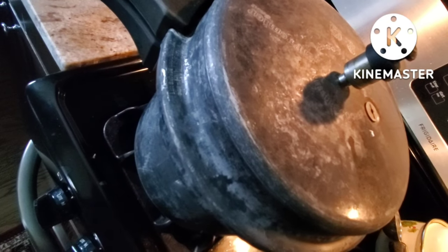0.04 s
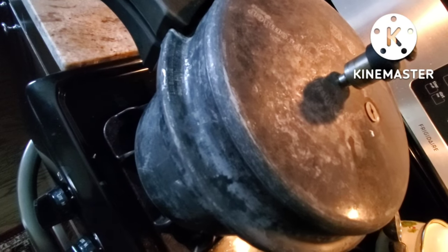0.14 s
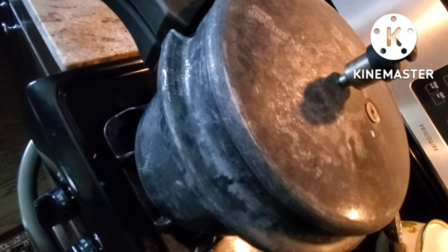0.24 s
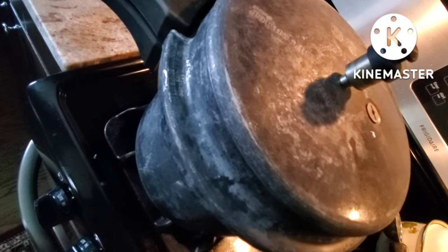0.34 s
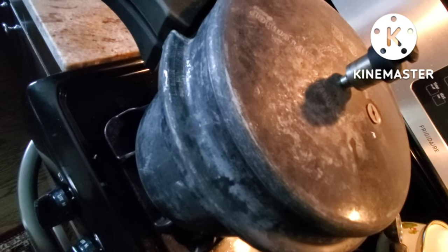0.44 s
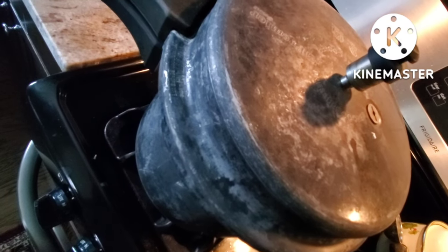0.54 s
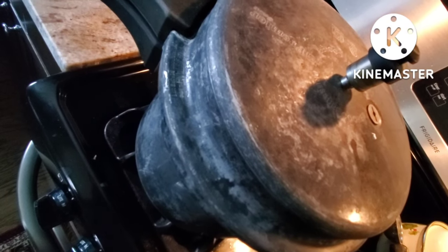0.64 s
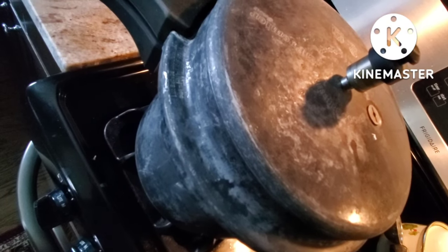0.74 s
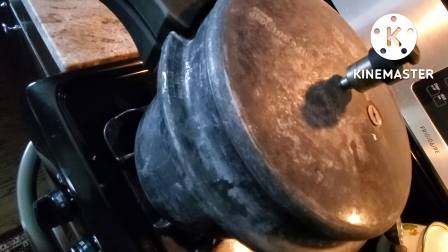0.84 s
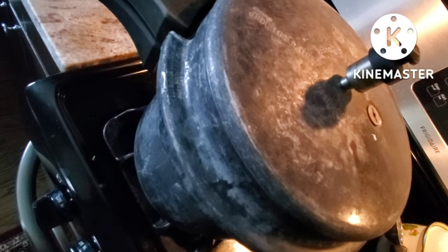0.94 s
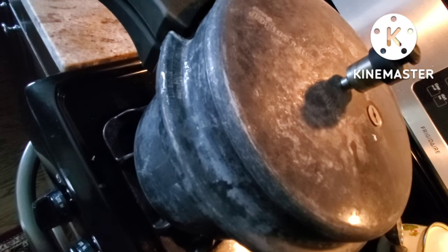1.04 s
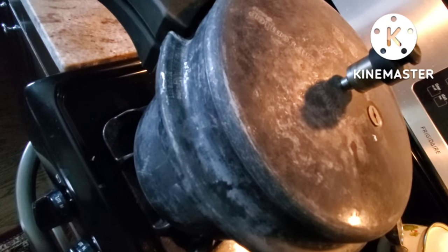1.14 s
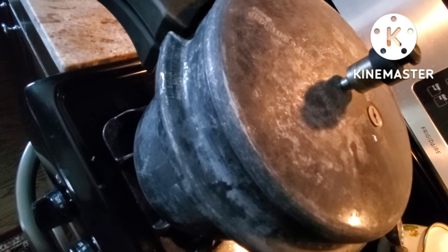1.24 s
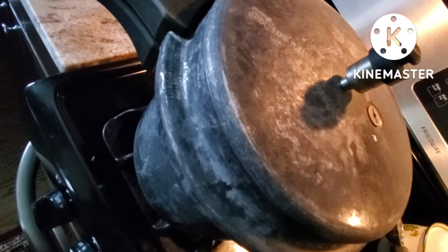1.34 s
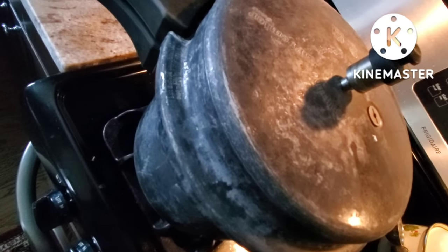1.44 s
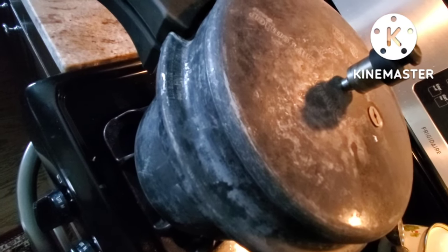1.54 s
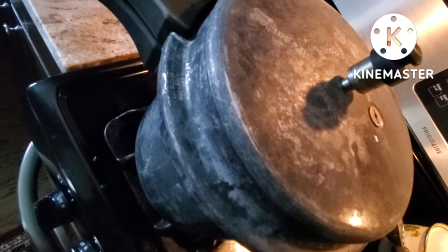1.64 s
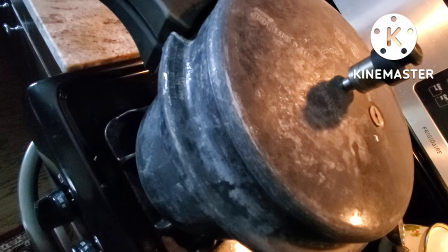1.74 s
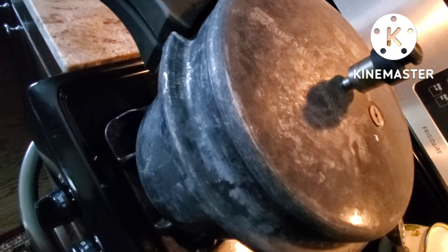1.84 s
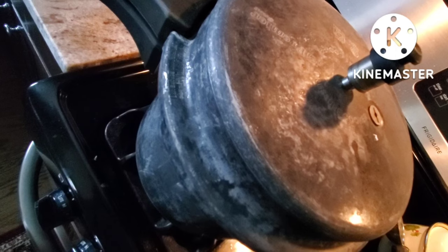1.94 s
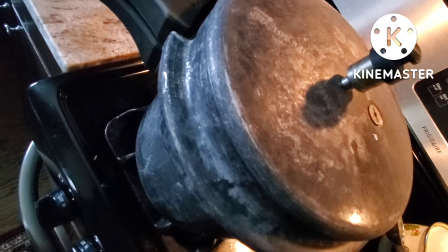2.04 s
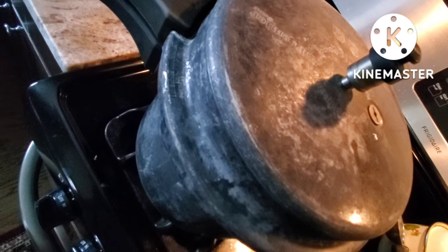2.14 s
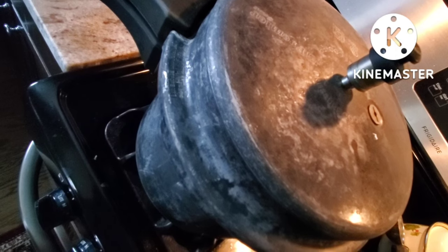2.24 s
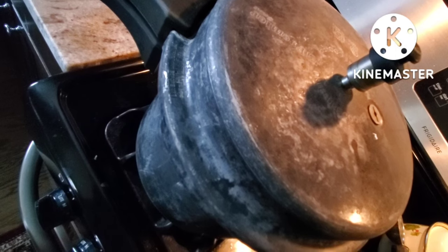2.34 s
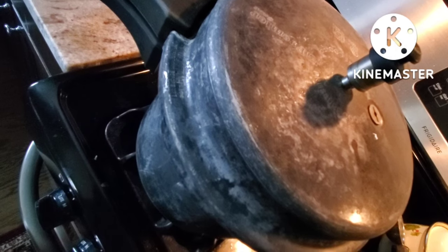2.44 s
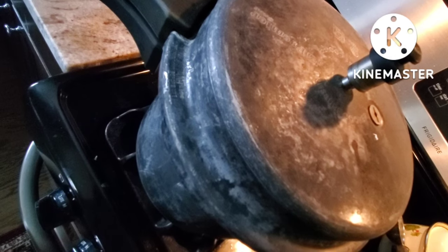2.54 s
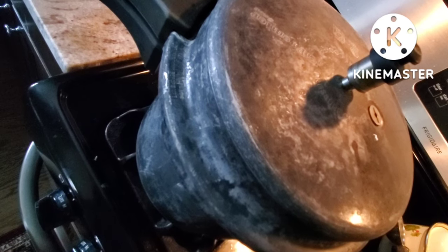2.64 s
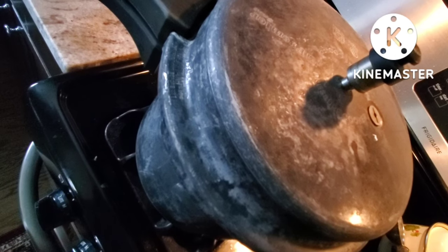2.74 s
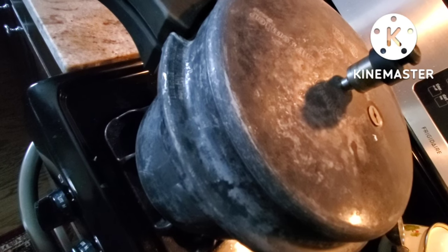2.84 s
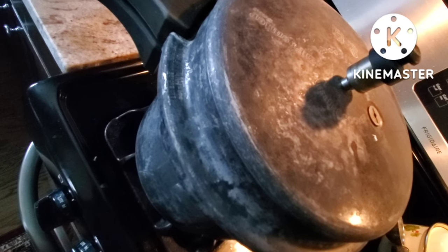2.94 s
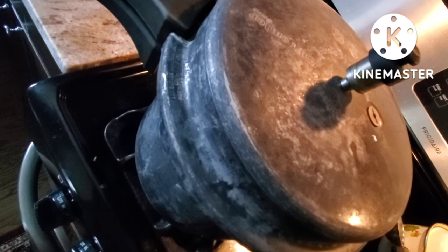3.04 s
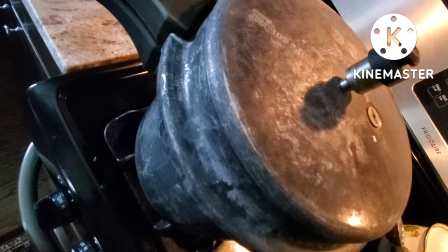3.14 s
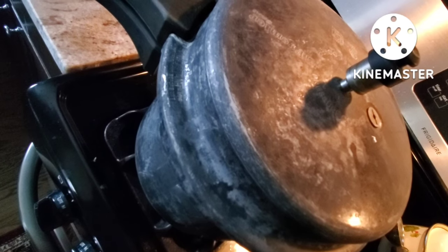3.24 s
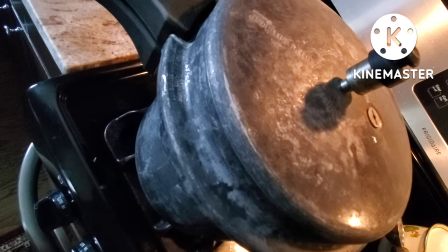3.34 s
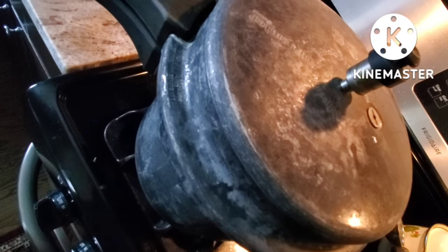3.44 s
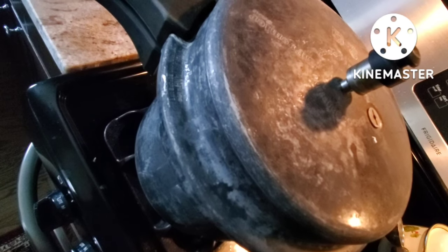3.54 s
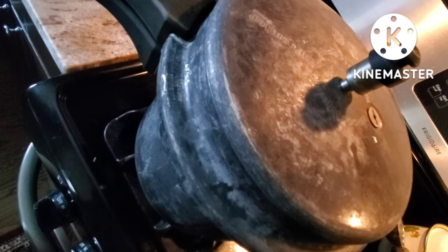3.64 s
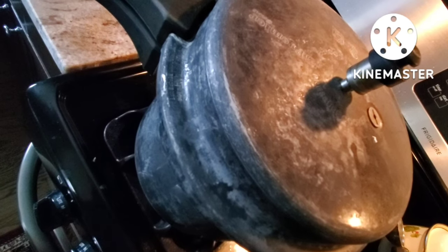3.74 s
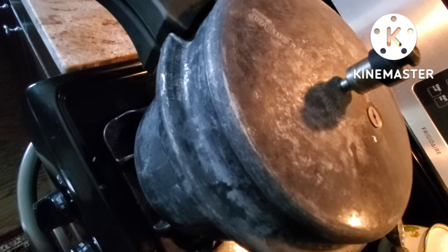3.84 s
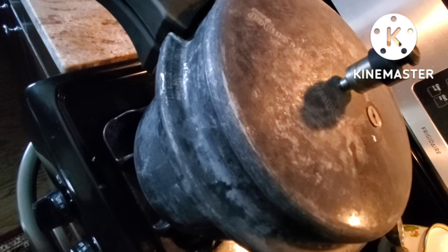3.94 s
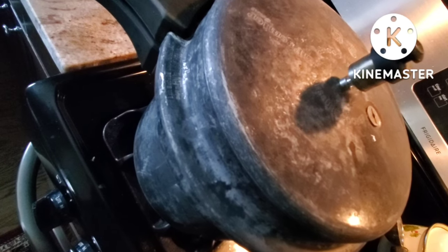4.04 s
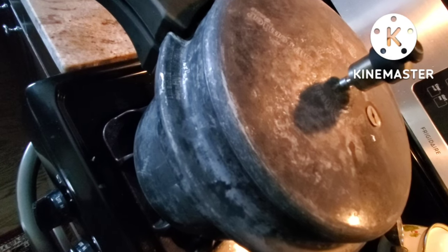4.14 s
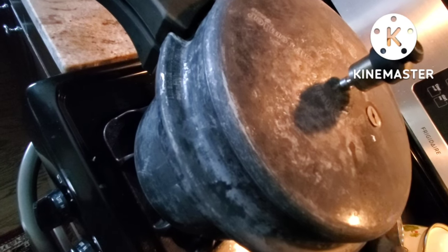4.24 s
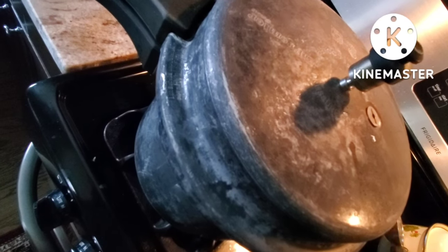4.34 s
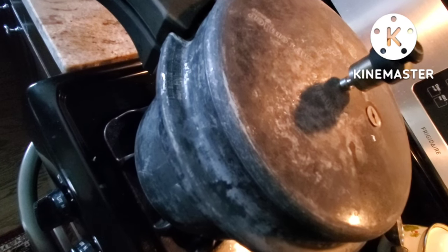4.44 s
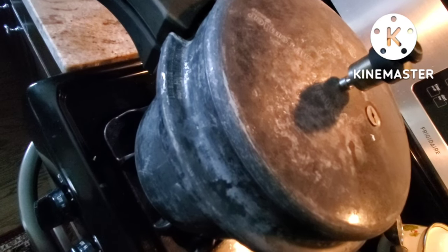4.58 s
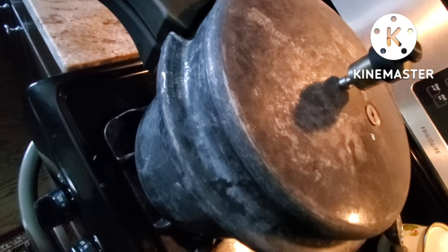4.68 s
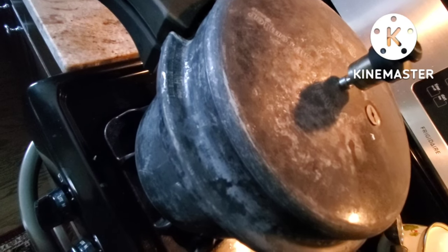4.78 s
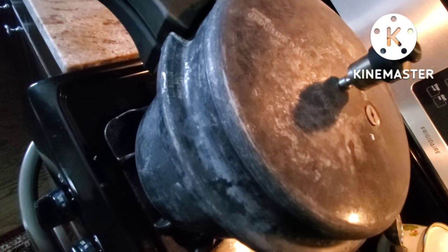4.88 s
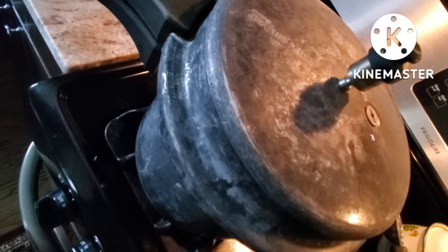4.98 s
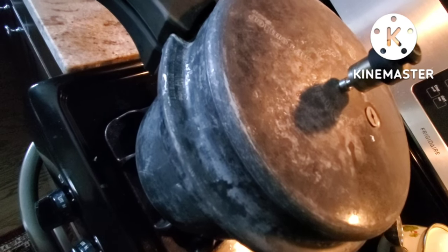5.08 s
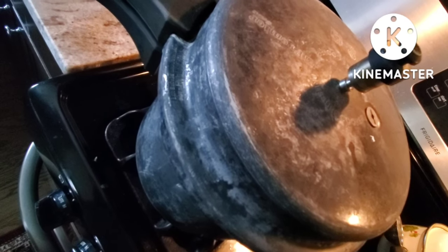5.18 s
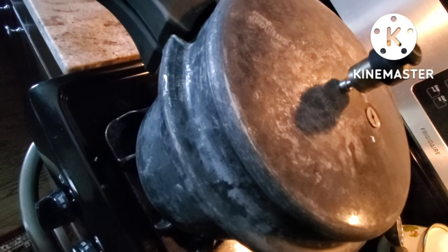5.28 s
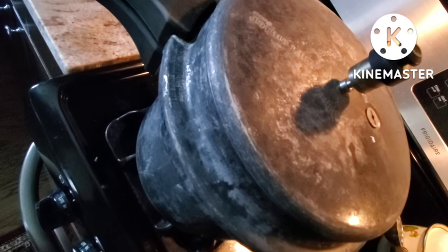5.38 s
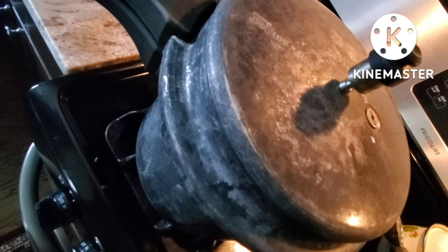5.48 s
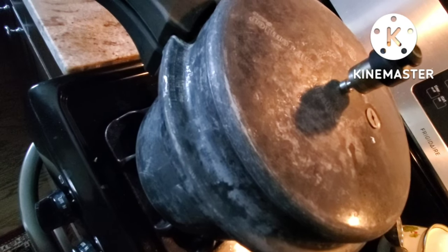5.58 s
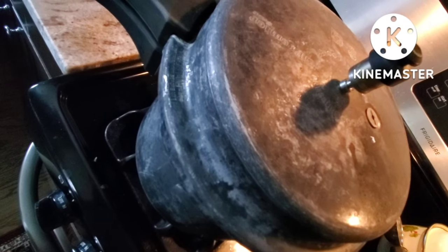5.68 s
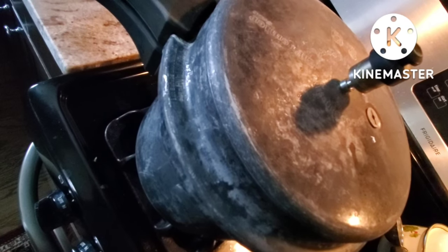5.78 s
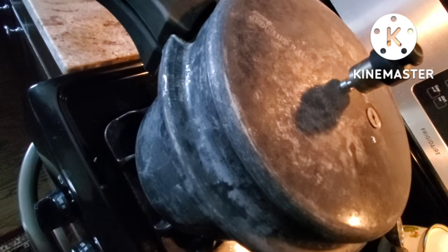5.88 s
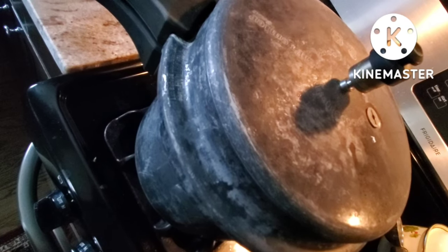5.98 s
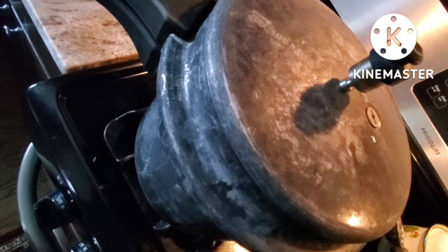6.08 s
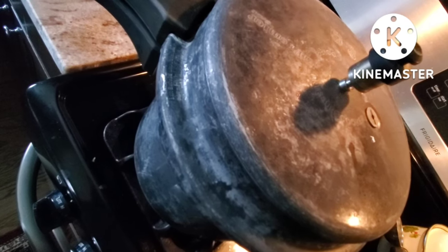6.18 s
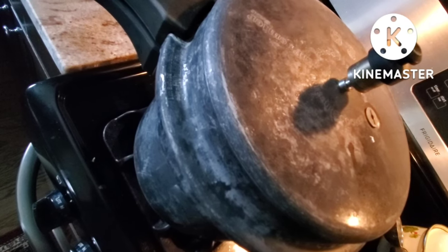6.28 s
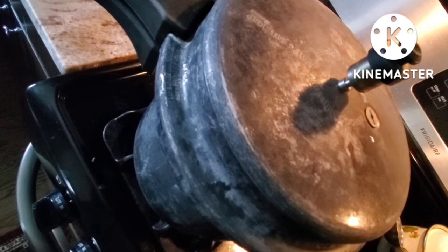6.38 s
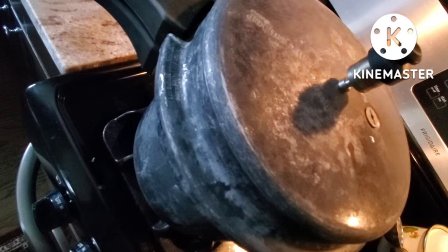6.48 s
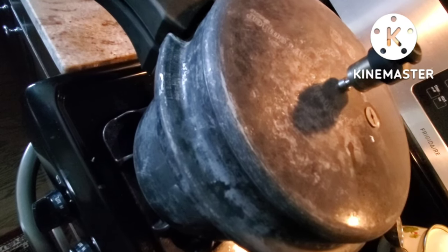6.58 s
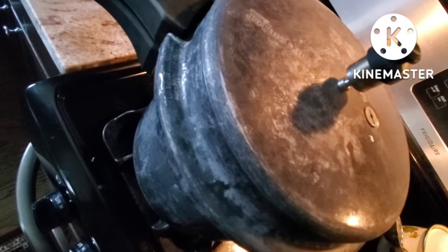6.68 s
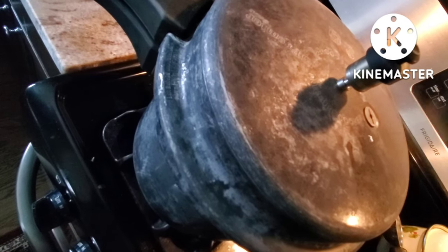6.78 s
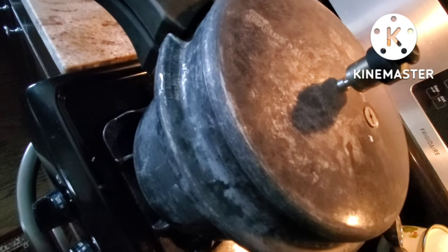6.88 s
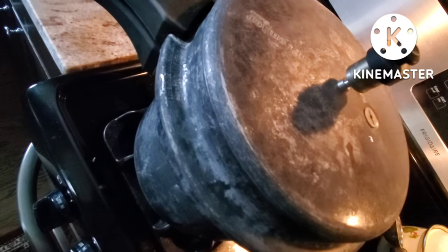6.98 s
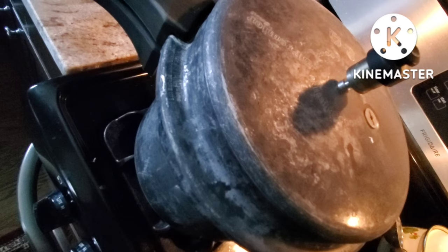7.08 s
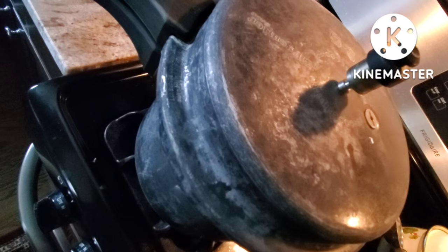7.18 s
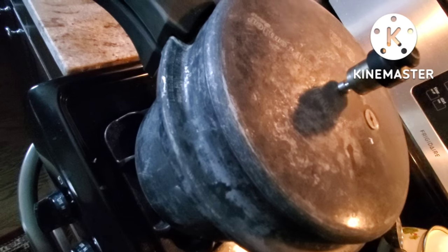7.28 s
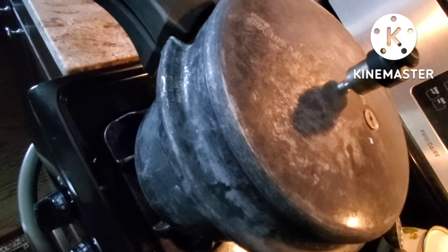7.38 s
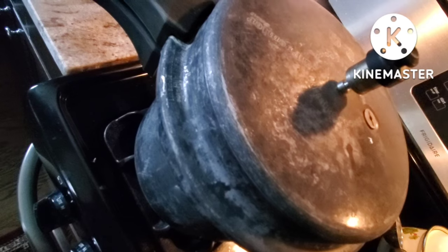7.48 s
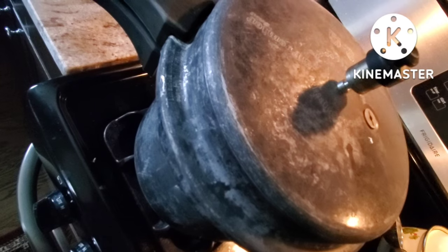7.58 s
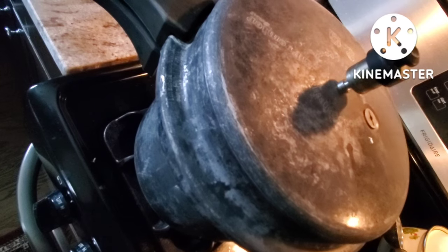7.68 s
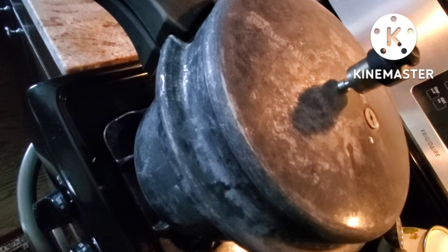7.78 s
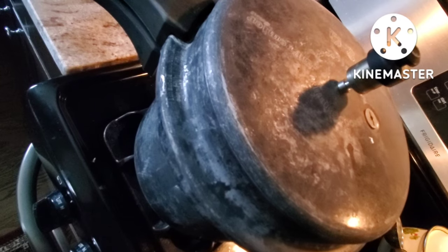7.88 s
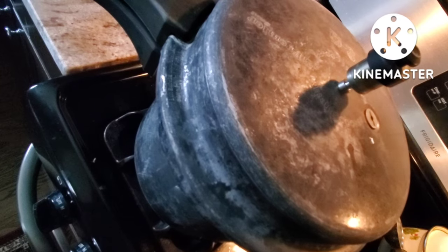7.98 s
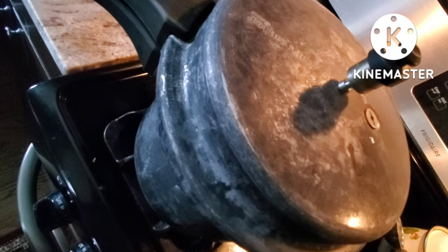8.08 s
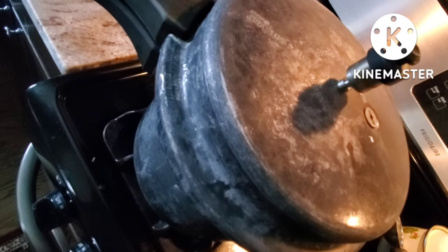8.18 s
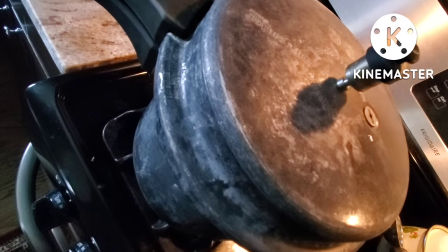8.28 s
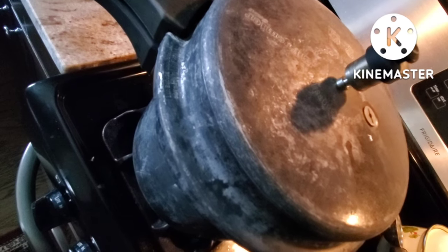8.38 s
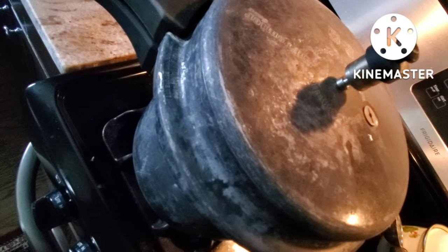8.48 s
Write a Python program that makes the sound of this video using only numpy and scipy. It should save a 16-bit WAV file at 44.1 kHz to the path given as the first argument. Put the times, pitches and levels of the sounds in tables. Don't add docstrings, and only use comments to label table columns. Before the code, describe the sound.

A pressure cooker simmers and leaks wavering steam for four seconds, then its weight lifts and a strong high jet hisses continuously.

```python
import sys
import numpy as np
from scipy import signal
from scipy.fft import rfft, irfft, next_fast_len
from scipy.io import wavfile
from scipy.ndimage import uniform_filter1d

SR = 44100
rng = np.random.default_rng(int(sys.argv[2]) if len(sys.argv) > 2 else 0)


def dump_mix(stems):
    frames = np.atleast_2d(stems).T
    limited = np.clip(frames, -1, 1)
    pcm = np.round(limited * 32767).astype(np.int16)
    wavfile.write(sys.argv[1], SR, pcm)


def nominal_scale(level):
    x = np.asarray(level, float) / 20
    return 10 ** x


N = 375732
TIME_S = np.arange(N) / SR


def curve(rows):
    time_s, level_db = np.transpose(rows)
    return np.interp(TIME_S, time_s, level_db)


def wander(rate_hz):
    lowpass = signal.butter(2, rate_hz, fs=SR / 64, output="sos")
    drift = signal.sosfiltfilt(lowpass, rng.standard_normal(N // 64 + 2))
    return np.interp(np.arange(N) / 64, np.arange(len(drift)), drift / drift.std())


def bump(peak_s, db, spread_s):
    return db * np.exp(-0.5 * ((TIME_S - peak_s) / spread_s) ** 2)


def ported_noise(colour, path, lo_hz, hi_hz, direct=1):
    size = next_fast_len(N)
    hz = np.fft.rfftfreq(size, 1 / SR)

    def column(rows, k):
        rows = np.array(rows)
        return np.interp(np.log(hz + 1), np.log(rows[:, 0] + 1), rows[:, k])

    common, own = rfft(rng.standard_normal((2, size)))
    share = np.clip(direct * column(path, 1), 0, 1)
    delayed = np.exp(-1j * column(path, 2)) * common
    left = share * delayed + np.sqrt(1 - share ** 2) * own
    edges = 1 / np.sqrt((1 + (lo_hz / (hz + 1)) ** 40) * (1 + (hz / hi_hz) ** 40))
    ports = np.array([left * nominal_scale(column(colour, 1)), common * nominal_scale(column(colour, 2))])
    return np.sqrt(SR / 2) * irfft(ports * edges, size)[:, :N]


# pitch_hz [Hz], left_db [dB], right_db [dB]
MOTOR_TONES = [
    (56.75, -45.5, -46),
    (113.5, -58, -57),
    (120, -53, -53),
    (170.2, -53, -54),
    (227, -53, -54),
    (283.7, -49, -55),
]


def hum():
    turns = np.cumsum(1 + 0.002 * wander(1.5)) / SR
    tones = 0
    for pitch_hz, left_db, right_db in MOTOR_TONES:
        strength = nominal_scale([[left_db], [right_db]] + 0.77 * wander(8.2))
        tones = tones + strength * np.sin(2 * np.pi * (pitch_hz * turns + rng.random()))
    return np.sqrt(2) * tones


# pitch_hz [Hz], left_db, right_db [dB per Hz]
POT_COLOUR = [(32, -88, -86), (48, -82, -82), (62, -69, -70), (75, -70.5, -67), (92.7, -57, -57.5),
              (129, -67, -65.5), (138, -59.5, -62), (168, -70, -69), (255, -59, -62.5), (313, -65, -69),
              (368, -58.5, -72), (379, -73.5, -63), (392, -64.5, -62.5), (428, -65.5, -64.5),
              (434, -65, -69.5), (488, -64, -68.5), (672, -63.5, -61.5), (734, -65.5, -75),
                  (934, -67, -68.5), (1045, -68.5, -82), (1250, -71, -69), (1420, -73, -82),
                  (1790, -70, -79.5), (2600, -78, -81.5), (2700, -78, -75), (3130, -78.5, -85.5)]
# pitch_hz [Hz], common_share [0-1], left_lag_rad [rad]
POT_COHERENCE = [(40, 1, 0), (247, 1, -0.42), (450, 0.57, .5), (705, 0.96, .5), (980, 0.36, 1.6),
                 (1380, 0.18, 3.5), (2240, 0.27, 7), (2800, 0.4, 8), (3200, 0, 6)]


def pot():
    noise = ported_noise(POT_COLOUR, POT_COHERENCE, 22, 3420)
    return noise * nominal_scale(0.48 * wander(2.4))


# start_s [s], level_db [dB peak], pitch_hz [Hz], t60_s [s]
STEM_KNOCKS = [
    (4.143, -26, 835, 0.025),
]


def knocks():
    out, t = np.zeros(N), np.arange(4000) / SR
    for start_s, level_db, pitch_hz, t60_s in STEM_KNOCKS:
        decay = nominal_scale(level_db - 60 * t / t60_s)
        attack = np.minimum(t / 0.002, 1)
        out[round(start_s * SR):][:len(t)] += decay * np.sin(2 * np.pi * pitch_hz * t) * attack
    return out * nominal_scale([[2.5], [-2.5]])


# peak_s [s], swing_db [dB], rocking_hz [Hz], build_s [s], dying_s [s]
ROCKING_BOUTS = [(1.209, 7, 16, 0.16, 0.03), (1.42, -7, 15.3, .06, 0.07), (1.63, 4, 13, .06, .1),
                 (1.93, -4, 14.0, .12, .09), (2.186, -4, 6.8, .025, .03), (2.574, 4.2, 13, 0.13, 0.11),
                 (2.785, -10.5, 12.2, 0.058, 0.069), (2.909, 6, 11.2, 0.023, .2),
                 (3.229, -3.5, 13.3, .07, 0.087), (3.404, -3.5, 7.7, 0.033, 0.02),
                 (3.667, 6.5, 14, .025, 0.086), (3.882, -4.5, 8.6, 0.11, .03), (3.961, -10, 12, .025, .025)]


def rocking():
    t = np.arange(0, N / SR, 0.002)
    swing = np.zeros(len(t))
    for peak_s, swing_db, rocking_hz, build_s, dying_s in ROCKING_BOUTS:
        from_peak = t - peak_s
        envelope = np.exp(-(from_peak / np.where(from_peak < 0, build_s, dying_s)) ** 2)
        swing += swing_db * np.cos(2 * np.pi * rocking_hz * from_peak) * envelope
    return np.interp(TIME_S, t, swing)


# pitch_hz [Hz], left_db, right_db [dB per Hz]
LEAK_COLOUR = [(3270, -78.5, -80.3), (4220, -73.0, -84.4), (5510, -77.3, -85.4), (6290, -72.1, -80.9),
               (7320, -85.2, -84.4), (7840, -84.8, -86.3), (8960, -80.5, -76.3), (10420, -72.3, -76.0),
               (10850, -75.2, -80.1), (11710, -84.5, -82.5), (12400, -83.2, -82.3), (13440, -86.5, -84.1),
               (14380, -92.2, -89.4), (15330, -89.9, -86.8)]
# start_s [s], level_db [dB]
LEAK_LEVEL = [
    (0.0, -48.5),
    (0.47, -49.5),
    (1.27, -45),
    (1.55, -48),
    (2.88, -45),
    (3.76, -44.5),
    (3.9, -43.5),
]
# pitch_hz [Hz], common_share [0-1], left_lag_rad [rad]
LEAK_COHERENCE = [(40, 0.99, 0.0), (690, 0.78, 0.5), (1380, 0.28, 2.7), (2240, 0.33, 7.0),
                  (2760, 0.33, 7.0), (3270, 0.05, 10.0), (3790, 0.27, 14.1), (4480, 0.15, 17.6),
                  (4820, 0.43, 17.7), (5340, 0.13, 18.3), (5940, 0.41, 13.7), (6120, 0.48, 13.4),
                  (6550, 0.59, 14.2), (6980, 0.35, 14.7),
                  (7060, 0.35, 14.9), (7670, 0.29, 13.3), (8440, 0.26, 15.6), (9220, 0.37, 14.9),
                       (9650, 0.27, 15.9), (9910, 0.22, 19.9), (10590, 0.59, 21.6), (11540, 0.17, 26.5),
                       (12060, 0.39, 30.6), (12400, 0.68, 31.3), (12830, 0.62, 31.6), (13950, 0.15, 34.8),
                       (14640, 0.34, 37.8), (15420, 0.13, 37.5)]


def leak():
    split_hz, low_depth = 5380, 0.51
    level_db = curve(LEAK_LEVEL) + 45.5 + rocking() + 0.6 * wander(25)
    path = LEAK_COHERENCE
    low = ported_noise(LEAK_COLOUR, path, 3380, split_hz, direct=0.58)
    high = ported_noise(LEAK_COLOUR, path, split_hz, 17000, direct=1.14)
    return low * nominal_scale(low_depth * level_db + 0.65) + high * nominal_scale(level_db)


# pitch_hz [Hz], left_db, right_db [dB per Hz]
LARGE_EDDIES = [(780, -79.0, -83.5), (1030, -76.8, -83.3), (1290, -73.8, -80.7), (1640, -69.0, -80.7),
                (2150, -70.2, -78.0), (2930, -69.3, -71.5), (3360, -71.6, -71.3), (3700, -63.5, -68.8),
                (4310, -58.6, -70.5), (5080, -60.7, -67.4), (5770, -65.6, -66.9), (6290, -62.8, -66.3),
                (6630, -63.1, -64.0), (6980, -65.9, -65.8)]
# pitch_hz [Hz], left_db, right_db [dB per Hz]
SMALL_EDDIES = [(7060, -66.7, -65.5), (7490, -68.4, -65.6), (8010, -67.0, -66.7), (8790, -66.8, -60.3),
                (9560, -60.1, -57.8), (10680, -58.2, -58.2), (11200, -60.8, -57.5), (11540, -64.6, -59.4),
                (12400, -62.5, -61.6), (13010, -65.8, -65.9), (13950, -70.5, -67.3), (14300, -71.2, -65.8),
                (14990, -68.5, -65.8), (15330, -69.7, -65.9)]
# pitch_hz [Hz], common_share [0-1], left_lag_rad [rad]
JET_COHERENCE_LOW = [(600, 0.69, 0.3), (950, 0.55, 0.9), (1380, 0.7, 1.0), (2760, 0.25, 2.2),
                     (3100, 0.31, 3.0), (3270, 0.24, 3.5), (3450, 0.17, 6.4), (3960, 0.29, 7.9),
                     (4390, 0.14, 8.8), (4650, 0.21, 5.3), (4910, 0.27, 4.8), (5770, 0.09, 4.0),
                     (6720, 0.17, 10.9), (6980, 0.1, 9.2)]
JET_COHERENCE_HIGH = [(7060, 0.12, 9.8), (7490, 0.1, 11.9), (7920, 0.14, 10.6), (8960, 0.07, 13.2),
                      (9470, 0.4, 14.7), (9730, 0.3, 16.0), (9990, 0.25, 18.4), (10770, 0.6, 21.9),
                      (11280, 0.5, 24.5), (11710, 0.36, 27.4), (12140, 0.59, 29.1), (12920, 0.17, 31.7),
                      (13610, 0.12, 35.2), (15420, 0.42, 40.5)]
# start_s [s], level_db [dB]
JET_LEVEL = [
    (3.97, -38),
    (4.0, -11),
    (4.04, -13.5),
    (4.075, -3),
    (4.12, 2),
    (4.2, 0.4),
    (4.3, 1),
    (4.45, 0),
    (8.52, 0.1),
]


def jet():
    falter_db = bump(6.7, db=-1.7, spread_s=0.04)
    level_db = curve(JET_LEVEL) - 26.5 + falter_db + 0.5 * wander(22)

    lead_db = bump(4.05, db=3, spread_s=0.02)
    roar = ported_noise(LARGE_EDDIES, JET_COHERENCE_LOW, 2870, 7100, direct=0.42)
    roar *= nominal_scale(lead_db - 5 + 31.5 + 0.22 * wander(16))

    fizz = ported_noise(SMALL_EDDIES, JET_COHERENCE_HIGH, 7260, 17500, direct=1.2)
    fizz *= nominal_scale(26.5 + 0.53 * wander(8.8))

    swell_db = bump(4.09, db=10, spread_s=0.01)
    body = ported_noise(LARGE_EDDIES, JET_COHERENCE_LOW, 740, 2976, direct=1.03)
    body *= nominal_scale(swell_db + 26 + 0.32 * wander(8.3))
    return (body + roar + fizz) * nominal_scale(level_db + [[-0.25], [0.25]])


def scene():
    duck_from_s, duck_time_s, duck_db = 4.075, 0.059, -17.5
    since_s = np.maximum(TIME_S - duck_from_s, 0)
    ducking = nominal_scale(duck_db * (1 - np.exp(-since_s / duck_time_s)))
    return (hum() + pot() + leak()) * ducking + jet() + knocks()


# pitch_hz [Hz], left_db, right_db [dB per Hz]
MICROPHONE_COLOUR = [(20, -88, -92), (45, -90, -93), (70, -93, -86), (300, -95, -91)]


def microphone_rumble():
    return ported_noise(MICROPHONE_COLOUR, POT_COHERENCE, 15, 360)


# pitch_hz [Hz], level_db [dB]
MASKING_THRESHOLD = [(1900, -16), (2300, -3.5), (2900, -4), (3500, -6), (4000, -13), (6500, -13),
                     (7400, -5.5), (8100, -5), (8800, -12.5), (11800, -8.5), (12600, -10.5), (13300, -3.5),
                     (14300, -4), (15100, -6)]


def thin_spectrum(x, contrast, top_hz):
    turn = np.array([[1, 0.86], [1, -0.98]]) / np.sqrt(2)
    frame = dict(window="cosine", nperseg=2048, noverlap=1024)
    hz, t, z = signal.stft(turn @ x, SR, **frame)
    power = abs(z) ** 2 + 1e-20
    bin_hz = hz[:, None]

    prominence = power / uniform_filter1d(power, size=21, axis=1)
    z = z * prominence ** (contrast * np.clip(bin_hz / 900, 0, 1))

    near = uniform_filter1d(power, size=5, axis=1)
    wide = uniform_filter1d(power * (bin_hz > 2000), size=150, axis=1)
    threshold_db = np.interp(hz, *np.transpose(MASKING_THRESHOLD))
    masked = near < wide * nominal_scale(2 * threshold_db)[:, None]
    z = z * np.where(masked, 0.02, 1)

    cut_out = uniform_filter1d(rng.standard_normal(len(t)), size=2) > 0.25
    z = z * (bin_hz < top_hz - 260 * cut_out)
    y = turn @ signal.istft(z, SR, **frame)[1][:, :N]
    return y * np.sqrt(np.mean(x ** 2) / np.mean(y ** 2))


def band_limit(x):
    return signal.sosfilt(signal.butter(12, 15560, fs=SR, output="sos"), x)


def record(dry):
    mix = thin_spectrum(dry + microphone_rumble(), contrast=0.11, top_hz=15500)
    return band_limit(mix)


dry = scene()
out = record(dry)
dump_mix(out)
```